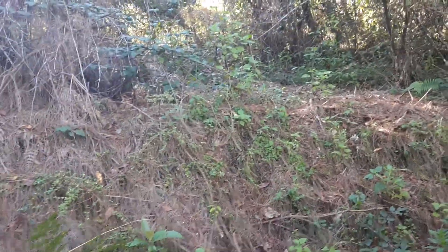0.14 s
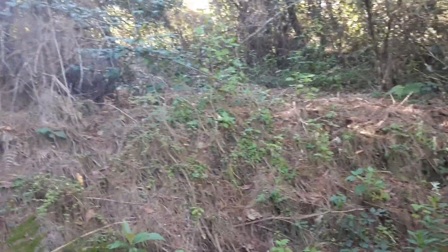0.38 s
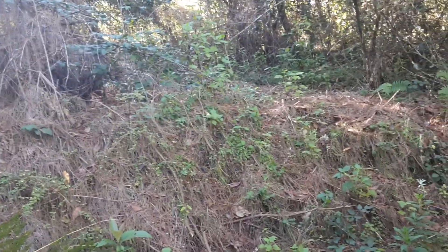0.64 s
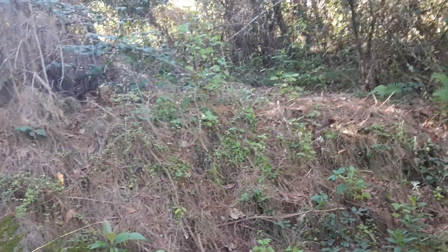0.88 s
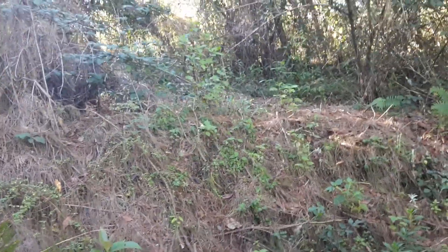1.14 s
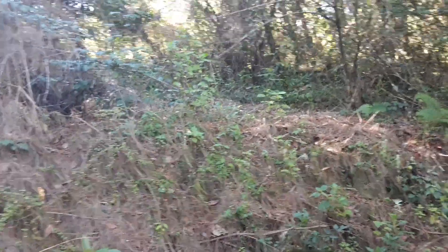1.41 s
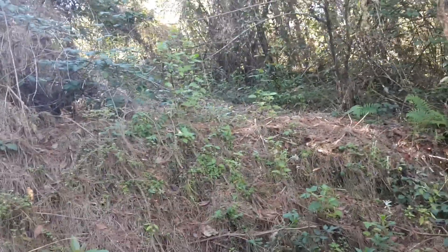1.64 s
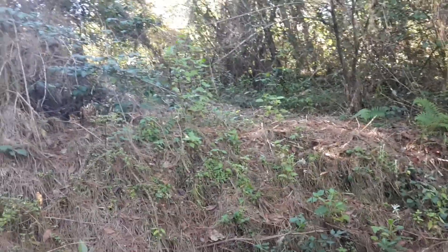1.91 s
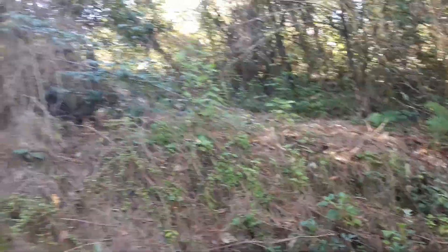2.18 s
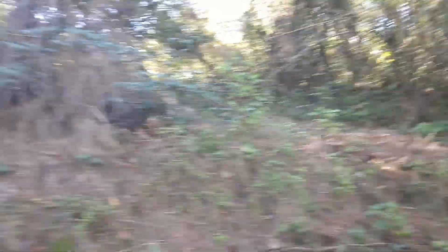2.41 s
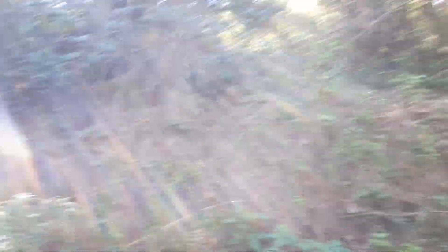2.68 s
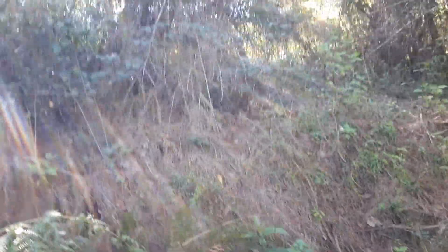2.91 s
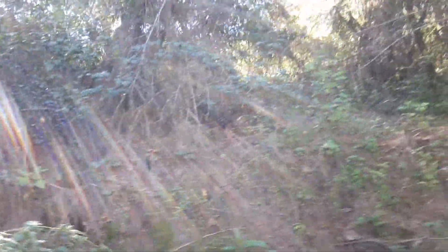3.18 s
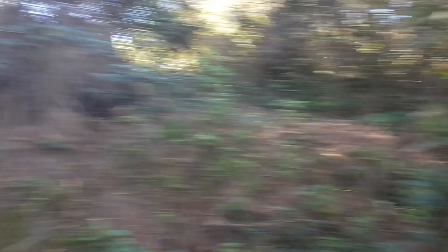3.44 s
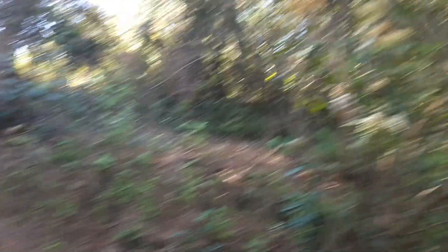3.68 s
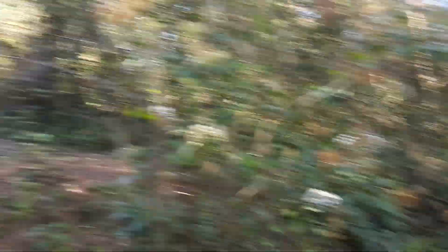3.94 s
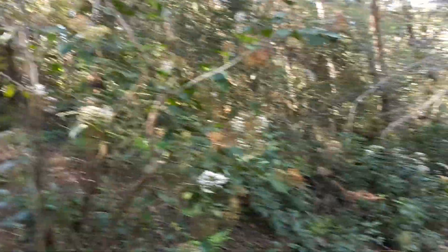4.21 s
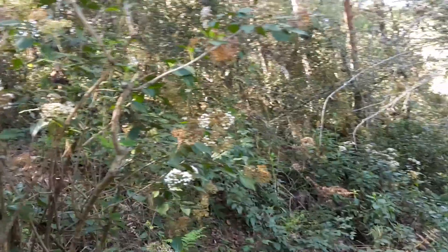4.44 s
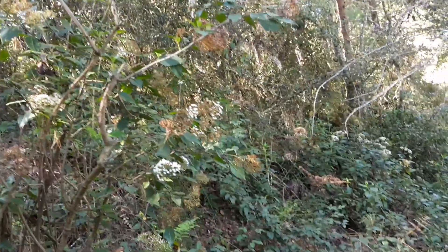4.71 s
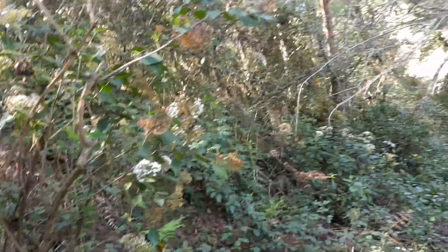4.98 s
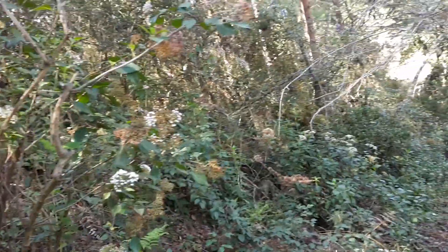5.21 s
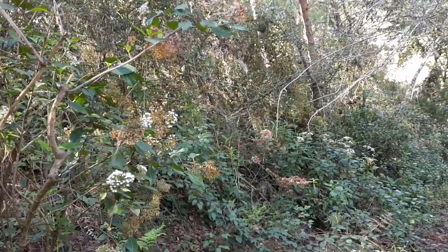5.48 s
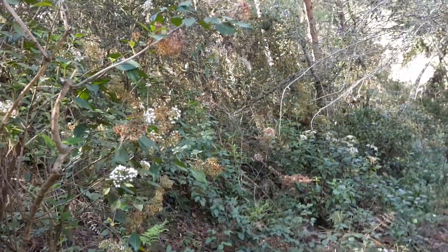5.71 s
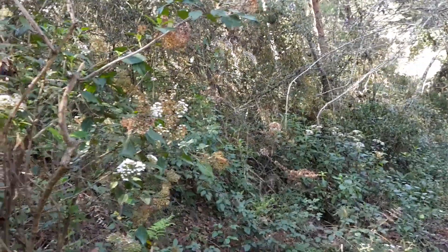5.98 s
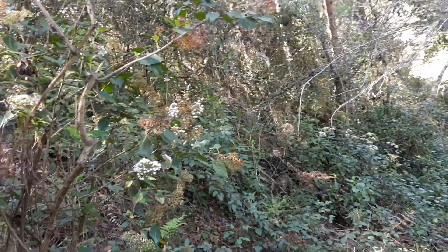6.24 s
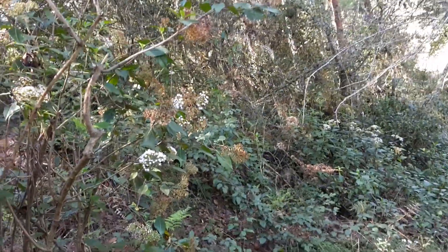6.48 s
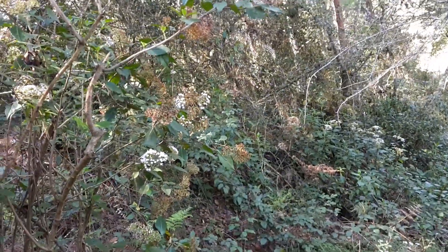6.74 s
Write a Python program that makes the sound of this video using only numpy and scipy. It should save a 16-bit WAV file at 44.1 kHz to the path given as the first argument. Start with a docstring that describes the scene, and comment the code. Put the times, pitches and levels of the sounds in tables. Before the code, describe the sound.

A far hound barks roughly eight times among trees, then long hollow howls rise and sink closer by, over faint air, wind bumps and twig ticks.

```python
"""Eight hoarse barks of a distant hound come first, some led in by a whine; a nearer hound then howls twice.
Barks are uneven pulses and noise filtered by throat resonances; howls are sums of nearly pure partials.
Trunks scatter the calls as sparse decaying echoes. Woodland air and treble hiss are shaped noise.
Wind pops, mostly in the right port of a turning hand-held camera, are brief pressure dips;
dry twigs tick as bursts of bright noise."""
import sys
import numpy as np
from scipy import signal
from scipy.fft import rfft, irfft
from scipy.io import wavfile
from scipy.ndimage import uniform_filter1d

SR = 44100
rng = np.random.default_rng(int(sys.argv[2]) if len(sys.argv) > 2 else 0)


def makeup_ratio(level_db):
    """Linear amplitude ratio for a level in decibels (20 dB per factor of ten)."""
    decades = np.asarray(level_db, float) / 20
    return 10 ** decades


def store_wav(level_fs):
    """Save 16-bit WAV to argv[1]."""
    pcm = np.round(np.clip(np.atleast_2d(level_fs), -1, 1) * 32767)
    wavfile.write(sys.argv[1], SR, pcm.T.astype(np.int16))


N = 302967  # length in samples

# Woodland air, relative spectrum: [f/Hz, level/dB]
AIR_SPECTRUM = [(18, -40.5), (30, -1), (43, 0.5), (557, -10.5), (1650, -30.5), (2500, -18.5), (3240, -43),
                (4770, -39), (5290, -57.5), (7600, -44), (8210, -53.5), (10100, -31.5), (14500, -51)]
# Treble hiss, relative spectrum: [f/Hz, level/dB]
HISS_SPECTRUM = [(7000, -18), (8200, -14.5), (9000, -3), (10000, 0.5), (14000, -6)]
# Swells of the hiss as the camera is moved: [t/s, half width to 1/e of power/s, level/dB]
RUSTLES = [(2.03, 0.17, -77), (2.819, .1, -73), (3.602, .2, -68.5), (4.75, .3, -72.5)]
# Strength of the wind: [t/s, level/dB]
GUSTS = [(0, -5.5), (1.199, -2), (2.6, 3), (3.101, -2.5), (4.299, 5), (5.198, -6.5), (6.87, -5)]
# Large eddies at the right port: [t/s, peak level ahead of the low cut/dB]
WIND_POPS = [(0.9847, -36), (1.02, -37.5), (1.124, -40), (1.195, -41.5), (1.2644, -38), (1.327, -41.5),
             (1.3844, -39.5), (1.895, -37.5), (1.9222, -38.5), (2.064, -37.5), (2.1516, -40),
             (2.2868, -40.5), (2.373, -40), (2.6763, -40.5), (2.7288, -34), (2.8356, -39.5), (3.5771, -31),
             (4.14, -28.5), (4.152, -35), (4.2798, -37), (4.385, -44), (4.442, -38), (4.52, -31.5),
             (6.7893, -25.5), (6.804, -50)]
# Twig snaps: [t/s, level of the burst at the right port ahead of its tail mix/dB]
TWIG_SNAPS = [(1.9597, -58), (2.0897, -62), (2.446, -62.5), (3.473, -55.5), (3.6765, -57), (3.7087, -55.5),
              (3.9339, -60), (6.2078, -62)]
# Decay time of the echoes among the trees: [f/Hz, t60/s]
ECHO_DECAY = [(500, 0.77), (1200, .4), (2800, 0.49)]
# Left-right likeness of the echoes: [f/Hz, likeness 0-1]
ECHO_LIKENESS = [(500, 0), (1200, 1), (2500, 0.5)]
# Lead of the direct sound at the left port as the camera turns: [t/s, lead/ms]
LEFT_LEAD = [(0, -.14), (3.95, -.11), (4.2, .11), (6.87, .13)]
# Left port over right port: [f/Hz, level/dB]
LEFT_OVER_RIGHT = [(60, -6), (300, 3), (550, 3), (1100, 6), (2800, 5), (9000, 1)]
# Thin whines that lead into barks: [t/s, level at mid-length/dB, f reached/Hz, length/s]
WHINES = [(0.608, -62, 834, 0.048), (1.622, -53, 850, 0.19), (2.326, -54, 730, .06),
          (2.651, -51, 767, 0.059)]
# Barks: [t/s, length/s, effort level/dB, ringing tone f/Hz, mouth resonance f/Hz]
BARKS = [(-.06, 0.26, -53.5, 655, 1193), (0.275, 0.32, -52, 652.7, 1072), (0.642, .25, -47.5, 656.7, 1105),
         (1.157, .22, -51, 657, 1256), (1.656, 0.31, -49, 645, 1170), (2.008, .21, -49, 622.3, 1292),
         (2.356, 0.25, -47.5, 630.8, 1121), (2.675, 0.26, -45, 636.8, 1189)]
# Bark resonances: (mouth pole width/Hz, broad cavity f/Hz, cavity pole width/Hz, cavity over mouth level/dB)
BARK_MOUTH = (81, 1064, 260, 0.1)
# Resonances of the bark's rasp: [f/Hz, pole width/Hz, relative drive level/dB]
RASP_RESONANCES = [(1800, 350, -2), (2358, 350, -1.5), (897, 180, 1)]
# One list a howl: [t/s, pitch f/Hz, effort level/dB, open-jawed second partial over first level/dB]
HOWLS = [
    [(3.21, 527.9, -43.5, -18), (3.41, 541, -46, -1), (3.48, 552.8, -44, -1), (3.56, 594, -45.5, -1),
     (3.7, 572.8, -37.5, -5), (3.88, 554.7, -35.5, -6), (4.13, 522.7, -33.5, -19.5),
     (4.39, 507.5, -34.5, -14), (4.5, 504.3, -38, -12.5), (4.8, 511.9, -39.5, -19.5),
     (4.88, 514.6, -34.5, -31), (4.907, 524, -35.5, -24)],
    [(5.305, 504.8, -37.5, 9.5), (5.5, 524, -47, -8.5), (5.7, 511.9, -37.5, -8.5), (5.82, 524.2, -40, -6.5),
     (6.02, 508.3, -36, -8.5), (6.17, 496.3, -31.5, -14), (6.44, 486.4, -35.5, -14.5),
     (6.56, 486.6, -33, -14), (6.69, 474.7, -36, -12), (6.87, 486.6, -35.5, -18)],
]
# Howl partials 4 to 6 against the partials that carry them: [f/Hz, level/dB]
UPPER_PARTIALS = [(1900, -27), (2550, -28), (2850, -44), (3150, -42), (3420, -23), (3900, -36)]
# Shape of the howl's breath, ahead of its gain from the voice: [f/Hz, level/dB]
BREATH_SPECTRUM = [(300, -13), (1100, -19), (2500, -21.5), (3000, -32.5), (5000, -36.5)]
# Breaks of the voice: [t/s, recovery/s, share of pitch lost, gain of partials 3 to 5/dB (half for 2)]
CRACKS = [(3.746, 0.028, .11, 11.5), (6.469, 0.048, .065, -1)]

AIR_DB, AIR_FOLLOWS = -60, 0.5  # level/dB in a 0 dB gust; dB per dB of gust
HISS_DB, HISS_CALL_DB, HISS_LATE_S = -88, -37.5, 0.15  # at rest; relative to the calls; lag time constant
BARK_RISE_S, BARK_FROM_DB, BARK_FALL_DB, BARK_HOLD_S = 0.054, -13.5, -23.5, 0.04  # arch of a bark
MOUTH_DB, MOUTH_LATE_S, MOUTH_STEEPER = -10, 0.03, 1.33  # the mouth peaks later and shuts further
RASP_DB, RASP_FOLLOWS = -9, 0.2  # re effort, ahead of the burst; dB per dB of the arch
HOARSE = 0.57  # noise weight 0-1, ahead of a threefold noise gain
THROB_LIMIT_DB, THROB_CORNER_HZ = 4, 14  # uneven throb of the ringing tone, ahead of its smoothing
SCOOP, SCOOP_S = 0.47, 0.046  # share of pitch missing at onset; time constant of the upward slide
SWELL_DB, SWELL_S = -37, 0.08  # a howl swells from this far down
# second partial until the jaws open; third to fifth are held back less, the sixth more
JAWS_DB, JAWS_S = -37.5, 0.1
THIRD_DB, THIRD_TILT = -26, -0.15  # third over first; dB per dB of the second partial
# dying pulses, echoes or beats, as the howl ends: spacing, decay of the first partial, total length
PULSE_S, PULSE_DB_PER_S, PULSING_S = 0.066, -175, 0.2
CRACK_FALL_S, CRACK_DIP_DB = 0.007, -4.5  # speed of the pitch drop; dip of the first partial
SHAKE_DB = 1.44  # rms of the second partial's quick shake; twice that on the third


def read(points, hz):
    """Interpolation: a spectrum is read on a logarithmic frequency axis."""
    f, value = np.transpose(points)
    return np.interp(np.log(hz + 1), np.log(f + 1), value)


def evened(x):
    """Normalisation: mean power is scaled to 1."""
    return x / np.sqrt(np.mean(x ** 2) + 1e-20)


def add(mix, s, sound):
    """Superposition: a sound is summed into the mix from time s."""
    part = mix[..., round(s * SR):][..., :sound.shape[-1]]
    part += sound[..., :part.shape[-1]]


def colour(x, db_of_hz):
    """Linear filtering: each frequency is weighted by a rule in dB."""
    gain = makeup_ratio(db_of_hz(np.fft.rfftfreq(x.shape[-1], 1 / SR)))
    return irfft(rfft(x) * gain, x.shape[-1])


def resonate(x, hz, width):
    """Heterodyne resonance: hz is shifted to zero, smoothed by a double pole and shifted back."""
    turn = np.exp(2j * np.pi * np.cumsum(hz * np.ones(len(x))) / SR)
    r = np.exp(-np.pi * width / SR)
    smooth = signal.lfilter([(1 - r) ** 2], [1, -2 * r, r * r], x / turn)
    return 2 * (turn * smooth).real


def drift(size, corner_hz):
    """Random modulation: white noise through a one-pole low-pass, of rms 1."""
    pole = np.exp(-2 * np.pi * corner_hz / SR)
    return evened(signal.lfilter([1], [1, -pole], rng.standard_normal(size)))


def curves(rows):
    """Piecewise-linear control: the columns of a call are interpolated to the sample rate."""
    s, *columns = np.transpose(rows)
    t = np.arange(s[0], s[-1], 1 / SR)
    return t, [np.interp(t, s, c) for c in columns]


def bump(t, s, half):
    """Gaussian envelope: a smooth swell around time s."""
    return np.exp(-((t - s) / half) ** 2)


def field(spectrum, patchy_db):
    """Diffuse noise field: random spectra, uncorrelated at the two ports, wax and wane in patches."""
    hz = np.fft.rfftfreq(1024, 1 / SR)
    a, b, patches = rng.standard_normal((N // 256 + 5, 513, 2, 3)).T
    patches = uniform_filter1d(patches, 10, 1)  # over frequency
    patches = evened(uniform_filter1d(patches, 10, 2))  # over time
    z = (a + 1j * b) * makeup_ratio(read(spectrum, hz)[:, None] + patchy_db * patches)
    return evened(signal.istft(z, nperseg=1024, noverlap=768)[1][:, :N])


def woodland_air():
    """Broadband ambience: a diffuse field whose level partly follows the gusts."""
    gust_db = np.interp(np.arange(N) / SR, *np.transpose(GUSTS))
    return makeup_ratio(AIR_DB + AIR_FOLLOWS * gust_db) * field(AIR_SPECTRUM, 4.4)


def hiss(calls):
    """Addition of noise powers: a steady bed, a part trailing the calls' loudness, and slow swells."""
    t, keep = np.arange(N) / SR, np.exp(-1 / (HISS_LATE_S * SR))
    trailing = signal.lfilter([1 - keep], [1, -keep], abs(calls)) ** 2
    power = makeup_ratio(2 * HISS_DB) + makeup_ratio(2 * HISS_CALL_DB) * trailing
    power += sum(makeup_ratio(2 * db) * bump(t, s, half) for s, half, db in RUSTLES)
    return np.sqrt(power) * field(HISS_SPECTRUM, 2.5)


def wind():
    """Turbulent pressure: eddies suck at the membrane, large ones at the right port, small at both."""
    eddies, u = np.zeros((2, N)), np.arange(-600, 601) / SR
    eddies[1, [round(s * SR) for s, db in WIND_POPS]] = makeup_ratio(np.array([db for s, db in WIND_POPS]))
    gusts = makeup_ratio(np.interp(np.arange(N) / SR, *np.transpose(GUSTS)))
    small = rng.random((2, N)) < 90 / SR  # on average 90 a second at each port
    small_db = 2.3 * rng.exponential(1, (2, N)).clip(0, 4) + [[-65], [-60]]
    eddies += small * gusts * makeup_ratio(small_db)
    suction = -np.exp(-(u / 0.0018) ** 2)
    return signal.oaconvolve(eddies, suction[None], "same")


def twigs():
    """Impulsive fracture: band-limited noise decays in two stages, 8 dB stronger at the left port."""
    out, t = np.zeros((2, N)), np.arange(1500) / SR
    band = signal.butter(3, [8300, 14000], "band", fs=SR, output="sos")
    decay = makeup_ratio(-60 * t / 0.018) + 0.16 * makeup_ratio(-60 * t / 0.032)  # snap and rustling tail
    for s, db in TWIG_SNAPS:
        snap = signal.sosfilt(band, rng.standard_normal((2, len(t)))) * decay
        add(out, s, makeup_ratio(db + np.array([[8], [0]])) * snap)
    return out


def trees(x):
    """Multiple scattering: sparse echoes from trunks, each band with its own decay and port likeness."""
    taps = np.zeros((2, SR))
    at = np.arange(500, SR - 20, 20) + rng.integers(0, 20, (2, (SR - 501) // 20))
    np.put_along_axis(taps, at, rng.choice([-1., 1.], at.shape), 1)
    hz, t, z = signal.stft(taps, SR, nperseg=256)
    alike = np.clip(read(ECHO_LIKENESS, hz), 0, 1)[:, None]
    z[1] = alike * z[0] + np.sqrt(1 - alike ** 2) * z[1]
    t60 = np.clip(read(ECHO_DECAY, hz), .05, 2)[:, None]
    tail = signal.istft(z * makeup_ratio(-60 * t / t60), SR, nperseg=256)[1]
    return signal.fftconvolve(x[None], tail / np.linalg.norm(tail[0]), axes=1)[:, :N]


def ports(x):
    """Arrival-time difference: direct sound reaches one port slightly earlier, as the camera points."""
    t = np.arange(N) / SR
    half_lead = np.interp(t, *np.transpose(LEFT_LEAD)) / 2000  # ms to s, half at each port
    return np.array([np.interp(t + half_lead, t, x), np.interp(t - half_lead, t, x)])


def whine(db, hz, length):
    """Frequency modulation: a soft unsteady sine scoops up to its pitch."""
    t = np.arange(0, length, 1 / SR)
    pitch = hz * (1 - 0.19 * np.exp(-t / 0.013) + 0.06 * drift(len(t), 30))
    turns = np.cumsum(pitch) / SR
    return makeup_ratio(db) * np.sqrt(2) * np.sin(2 * np.pi * turns) * np.sin(np.pi * t / length)


def bark(start, length, effort_db, hz, mouth_hz):
    """Source and filter: uneven pulses at half the ringing tone and noise puffs excite the throat."""
    t = np.arange(0, length, 1 / SR)

    def arch(top):
        levels = [BARK_FROM_DB, 0, 0, BARK_FALL_DB]
        return np.interp(t, [0, top, top + BARK_HOLD_S, length], levels)

    throb = np.tanh(evened(uniform_filter1d(drift(len(t), THROB_CORNER_HZ), size=500)))
    tone_db = effort_db + arch(BARK_RISE_S) + THROB_LIMIT_DB * throb
    mouth_db = effort_db + MOUTH_DB + MOUTH_STEEPER * arch(BARK_RISE_S + MOUTH_LATE_S)

    turns = np.cumsum(hz / 2 * (1 + .022 * drift(len(t), 20))) / SR
    folds = evened(sum(np.cos(2 * np.pi * k * turns) for k in range(3, 10)))
    puffs = evened((0.41 + np.exp(-(turns % 1) / 0.54)) * rng.standard_normal(len(t)))
    drive = (1 - HOARSE) * folds + 3 * HOARSE * puffs

    tone = np.sqrt(2) * np.cos(2 * 2 * np.pi * turns) + 0.59 * evened(resonate(puffs, hz, 150))
    width, cavity_hz, cavity_width, cavity_db = BARK_MOUTH
    cavity = makeup_ratio(cavity_db) * evened(resonate(drive, cavity_hz, cavity_width))
    mouth = evened(resonate(drive, mouth_hz, width)) + cavity
    rasp = evened(sum((-1) ** k * makeup_ratio(db) * resonate(drive, f, w)
                      for k, (f, w, db) in enumerate(RASP_RESONANCES)))
    # the rasp bursts out as the jaws snap open, then sinks unsteadily
    burst_db = 2 * drift(len(t), 21) - 60 * t / 1.78 + RASP_FOLLOWS * arch(BARK_RISE_S)
    burst = (1 - np.exp(-t / 0.0067)) * makeup_ratio(burst_db)

    voice = makeup_ratio(tone_db) * tone + makeup_ratio(mouth_db) * mouth + makeup_ratio(effort_db + RASP_DB) * burst * rasp
    voice = colour(voice, lambda f: -np.maximum(f - 2680, 0) / 20)  # foliage and distance swallow the top
    voice = voice * signal.windows.tukey(len(t), .12)
    return max(start, 0), voice[max(round(-start * SR), 0):]  # a negative start is cut at 0 s


def slip(t, s, recovery):
    """Register break: a sudden departure towards time s heals at its own rate."""
    return np.exp(-((t - s) / np.where(t < s, CRACK_FALL_S, recovery)) ** 2)


def howl(rows):
    """Harmonic synthesis: partials share one pitch; a separate faint breath follows the voice."""
    end = rows[-1][0]
    t, (hz, effort_db, mouth_db) = curves(rows + [(end + PULSING_S, *rows[-1][1:])])
    age, after, size = t - t[0], np.maximum(t - end, 0), len(t)
    lost = sum(share * slip(t, s, heal) for s, heal, share, db in CRACKS)
    crack = makeup_ratio(sum(db * slip(t, s, heal) for s, heal, share, db in CRACKS))
    dip_db = CRACK_DIP_DB * sum(slip(t, s, heal) for s, heal, share, db in CRACKS)

    hz = uniform_filter1d(hz, 600) * (1 - SCOOP * np.exp(-age / SCOOP_S)) * (1 - lost)
    turns = np.cumsum(hz * (1 + 0.005 * drift(size, 31))) / SR
    pulses = makeup_ratio(PULSE_DB_PER_S * after) * np.cos(np.pi * after / PULSE_S)
    effort = makeup_ratio(effort_db + SWELL_DB * np.maximum(1 - age / SWELL_S, 0) ** 1.5) * pulses
    jaws_db = JAWS_DB * np.exp(-(age / JAWS_S) ** 4) + PULSE_DB_PER_S * after

    def partial_level(k, db):  # higher partials flutter more
        flutter_db = (k + 1) * 0.76 * drift(size, 3.8) + k * SHAKE_DB * drift(size, 6.7)
        return effort * makeup_ratio(db + flutter_db)

    one = partial_level(0, dip_db)
    two = partial_level(1, jaws_db + mouth_db)
    three = partial_level(2, jaws_db / 2 + THIRD_DB + THIRD_TILT * mouth_db)
    levels = one, two * np.sqrt(crack), three * crack
    voice = sum(g * np.cos(2 * np.pi * (k + 1) * turns - 2.3 * k) for k, g in enumerate(levels))
    whole = np.sqrt(one ** 2 + two ** 2) + 1e-9
    for k in range(4, 7):  # upper partials come and go as the mouth moves
        if k < 6:
            carrier = crack * whole * makeup_ratio(0.38 * jaws_db + 0.42 * mouth_db)
        else:  # the sixth rings only when the second partial is pressed
            carrier = two ** 2 / whole
        level = carrier * makeup_ratio(read(UPPER_PARTIALS, k * hz) + 3.3 * drift(size, 6.8))
        voice += level * np.cos(2 * np.pi * (k * turns + rng.random()))

    noise = rng.standard_normal(size)
    breath = colour(noise, lambda f: read(BREATH_SPECTRUM, f) - 20 * (f > 5300))
    breath = whole * makeup_ratio(.3 * mouth_db) * breath
    return t[0], np.array([np.sqrt(2) * voice, breath]) * signal.windows.tukey(size, .01)


def scene():
    """Direct-to-reverberant ratio: far barks are wet, near howls drier, their breath only scattered."""
    far, near = np.zeros(N), np.zeros((2, N))  # near: voice, breath
    for row in BARKS:
        add(far, *bark(*row))
    for s, db, hz, length in WHINES:
        add(far, s, whine(db, hz, length))
    for rows in HOWLS:
        add(near, *howl(rows))
    direct = far + near[0]
    echoed = makeup_ratio(-8) * far + makeup_ratio(-16) * near[0] + near[1]
    heard = ports(direct) + trees(echoed) + hiss(direct) + woodland_air()
    left = colour(heard[0], lambda f: read(LEFT_OVER_RIGHT, f) / 2)
    right = colour(heard[1], lambda f: -read(LEFT_OVER_RIGHT, f) / 2)
    return np.array([left, right]) + wind() + twigs()


def low_pass(x):
    """Removes everything above the highest recorded frequency."""
    return signal.sosfilt(signal.butter(12, 14720, fs=SR, output="sos"), x)


def record(dry):
    """Pressure leakage: the microphones lose low pressure below 52 Hz, so each wind pop overshoots."""
    leaky = signal.sosfilt(signal.butter(2, 52, "high", fs=SR, output="sos"), dry)
    return low_pass(leaky)


dry = scene()
out = record(dry)
store_wav(out)
```